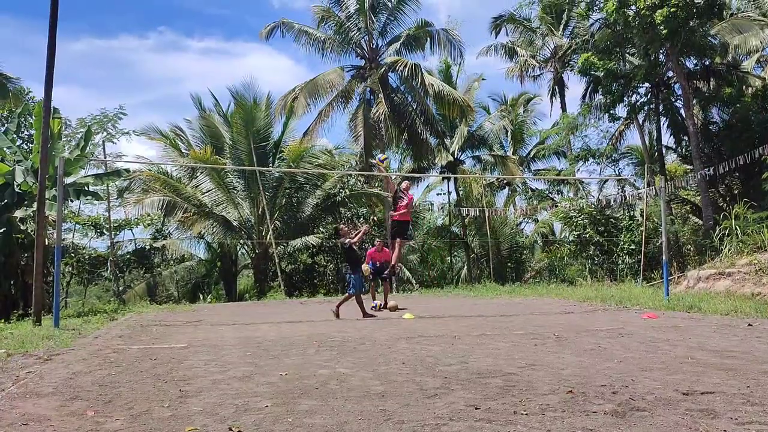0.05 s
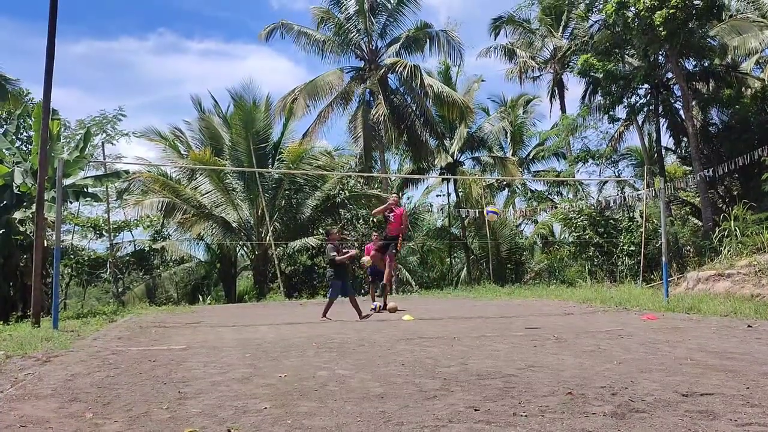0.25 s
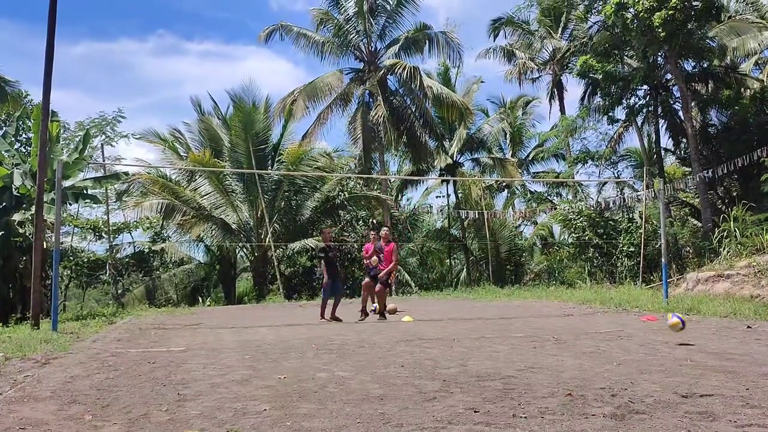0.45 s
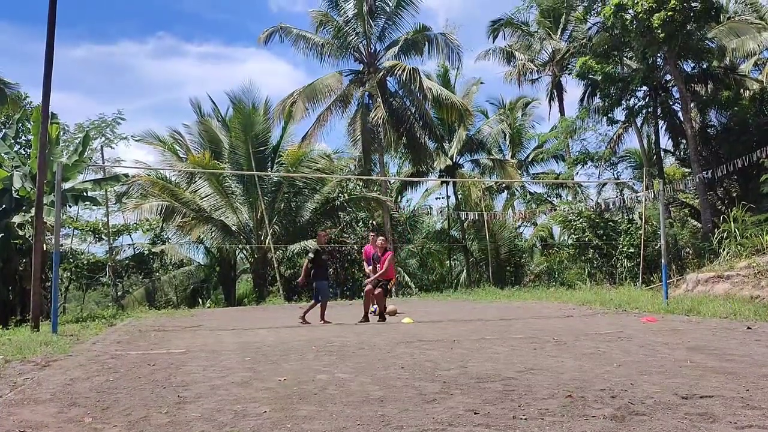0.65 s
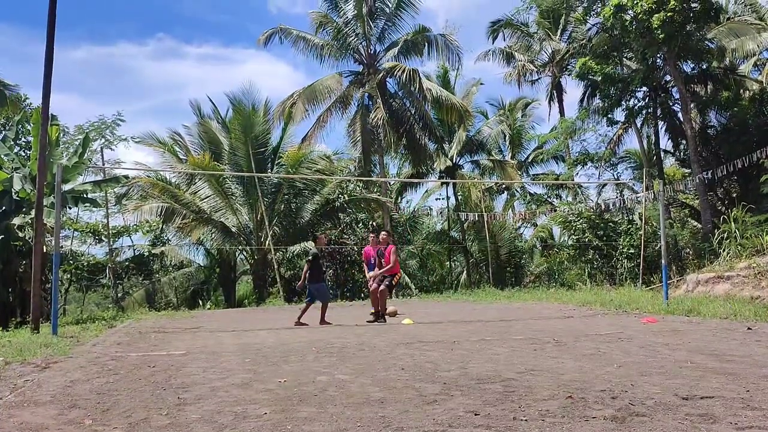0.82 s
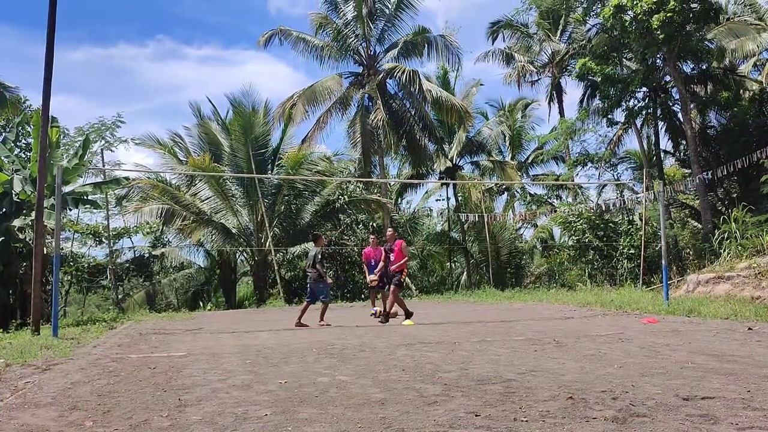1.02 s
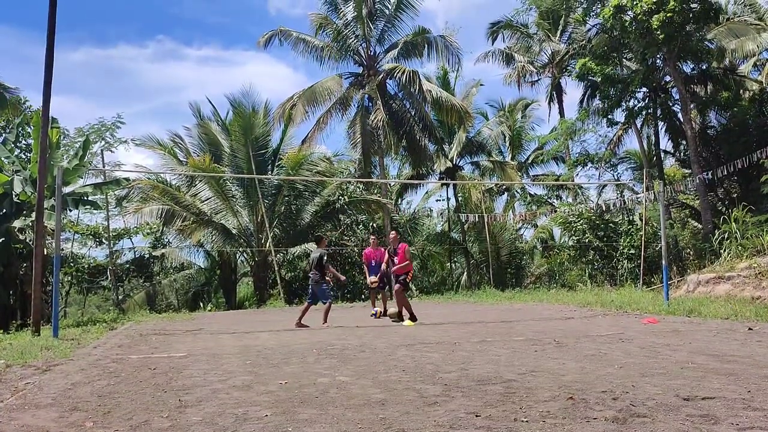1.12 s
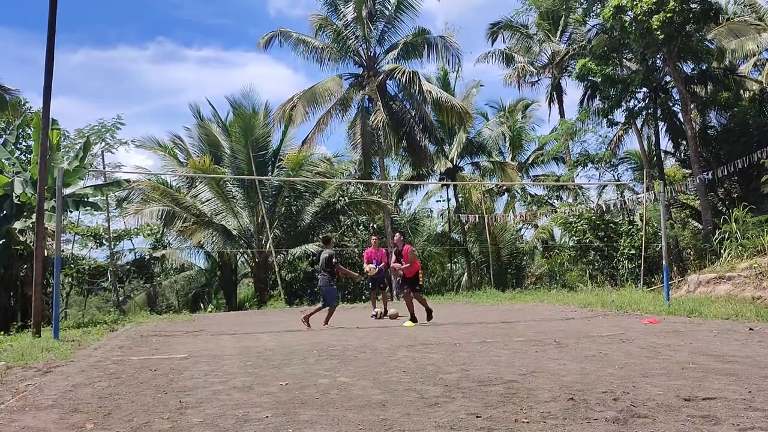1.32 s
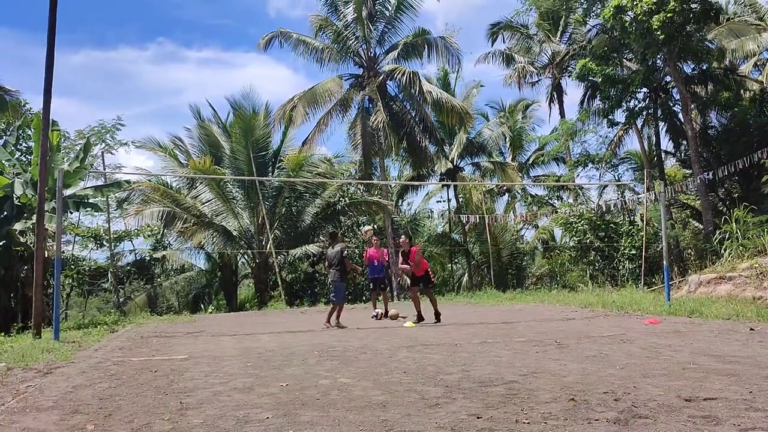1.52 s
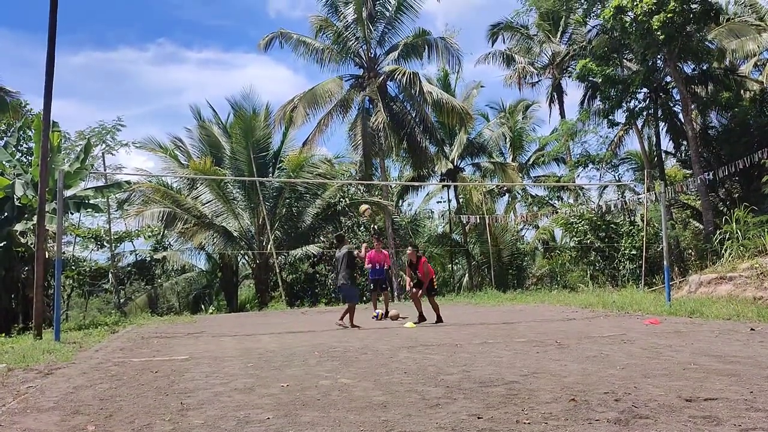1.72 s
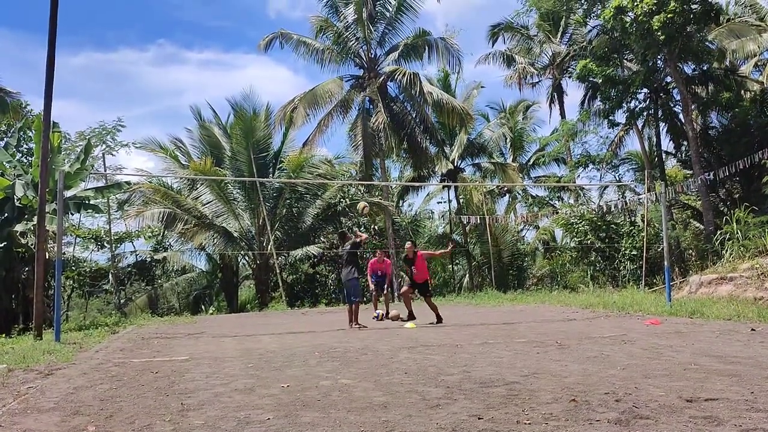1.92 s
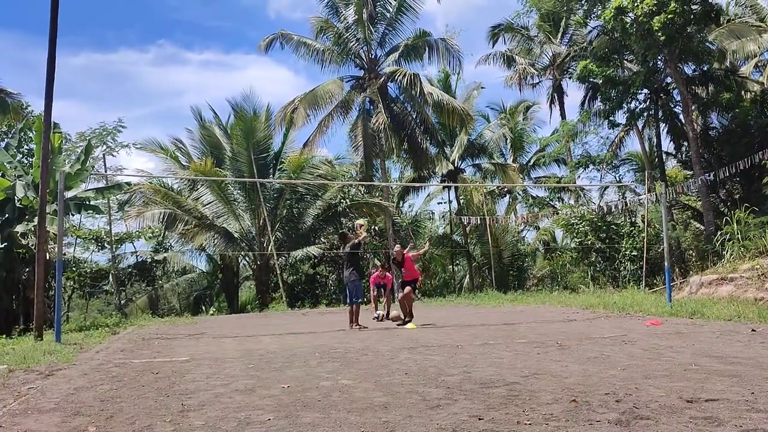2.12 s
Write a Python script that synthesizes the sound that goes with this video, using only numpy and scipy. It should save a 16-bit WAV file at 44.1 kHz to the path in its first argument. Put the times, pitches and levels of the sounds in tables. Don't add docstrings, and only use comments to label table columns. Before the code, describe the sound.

A volleyball is hit hard with a loud hollow smack, then bounces twice on dirt; faint cicadas, light breeze and scuffing feet continue, and a softer ball touch comes last, heard from a distance in stereo outdoors.

```python
import sys
import numpy as np
from scipy import signal
from scipy.fft import rfft, irfft
from scipy.io import wavfile

SR = 44100
rng = np.random.default_rng(int(sys.argv[2]) if len(sys.argv) > 2 else 0)


def natural_amplitude(level_db):
    exponent = np.asarray(level_db, float) / 20
    return 10 ** exponent


def materialize(psi):
    bounded = np.clip(np.atleast_2d(psi).T, -1, 1)
    quanta = np.round(bounded * 32767).astype(np.int16)
    wavfile.write(sys.argv[1], SR, quanta)


N = 94815


def rms_one(x):
    return x / np.sqrt(np.mean(x ** 2) + 1e-20)


def at_hz(points, hz):
    table = np.array(points)
    return np.interp(np.log(hz), np.log(table[:, 0]), table[:, 1])


def band(x, low_hz, high_hz):
    sos = signal.butter(2, [low_hz, min(high_hz, .45 * SR)], "band", fs=SR, output="sos")
    return signal.sosfilt(sos, x)


def drift(rate_hz):
    r = np.exp(-80 * np.pi * rate_hz / SR)
    white = rng.standard_normal(N // 40 + 2002)
    slow = signal.lfilter([1], [1, -2 * r, r * r], white)[2000:]
    return np.interp(np.arange(N) / 40, np.arange(len(slow)), rms_one(slow))


def hump(start_s, length_s):
    t = np.arange(N) / SR
    return np.sin(np.pi * np.clip((t - start_s) / length_s, 0, 1)) ** 2


# f/Hz, correlation
LIKENESS = [(60, 0.87), (180, 0.93), (540, 0.23), (1640, -0.37), (4930, 0.14), (14900, -0.53)]
EDGES_HZ = 25 * 2 ** np.arange(0, 9.3, .5)


def banded(spectrum, shape, patchy_db):
    out, power = 0, 0
    white = rng.standard_normal((2, 2, N))
    for k, (low, high) in enumerate(zip(EDGES_HZ, EDGES_HZ[1:])):
        mid, side = band(white[k % 2], low, high)
        hz = np.sqrt(low * high)
        level_db = at_hz(spectrum, hz)
        alike = np.clip(at_hz(LIKENESS, hz), -1, 1)
        power += natural_amplitude(level_db) ** 2 * (high - low) * 2 / SR
        stereo = np.sqrt(1 + alike) * mid + np.sqrt(1 - alike) * side * [[1], [-1]]
        out = out + natural_amplitude(level_db + patchy_db * drift(7)) * shape(hz) * stereo
    return out / np.sqrt(power)


# t/s, thump f/Hz, thump rise/s, left lag/s, contact/s
BLOWS = [
    (.1978, 150, .004, .0001, .0082),
    (.4431, 168, .0012, .0001, .0075),
    (.5920, 127, .0006, .0002, .009),
    (1.8461, 128, .001, .0006, .0103),
]
# thump level/dB, ring level/dB, slap level/dB, wash level/dB, ring tilt/(dB/octave)
VOICING = [(-11, -30.5, -12, -34, 2.5), (-23.5, -41, -22.5, -49, 3), (-15, -31, -19, -42, 0.5),
           (-21.5, -52.5, -44, -56, -10)]
# early echo loss/dB, ring on leaving/dB, slap f/Hz, ring length share, thump swings
AFTER = [(-2, -2, 3900, 1.0, 1.85), (-4, -3, 5200, .9, 1.75), (-2, -4, 2700, .9, 1.8),
         (-14, 6, 1800, .45, 1.5)]
# delay/s, level/dB
ECHOES = [(.0245, -15), (.031, -19), (.055, -24)]
# f/Hz, level/dB, t60/s
BALL = [(320, 20, 0.0059), (500.5, 0.3, 0.065), (704, 9, 0.012), (843, 5.5, 0.027), (1027, -8.5, 0.031),
        (1279, -5, 0.06), (1413, -2.5, 0.028), (1638, -13.5, 0.12), (2110, 0, 0.025), (2622, -0.5, 0.032),
        (3228, -8.5, 0.04), (3900, -16, 0.012), (4400, -21, 0.011), (5690, -25, 0.0076)]
THUMP_FADE, THUMP_HEAD_START = 2.0, .14
RING_RISE_S, LEAVE_TILT_DB = .0003, -1.5
SLAP_S, SLAP_SPREAD, SLAP_EDGE_DB = .003, 1.22, -9


def thump(t, hz, rise_s, swings):
    turn = np.clip(t * hz / swings, 0, 1)
    swing = np.sin(2 * np.pi * (hz * t + THUMP_HEAD_START))
    return swing * (1 - np.exp(-t / rise_s)) * np.cos(np.pi / 2 * turn ** THUMP_FADE)


def ball_ring(t, late_s, level_db, tilt_db, length_share):
    hz, mode_db, t60_s = np.array(BALL).T
    u = np.maximum(t - late_s, 0)
    chance_db = rng.normal(0, 1, len(hz))
    gains = natural_amplitude(level_db + mode_db + tilt_db * np.log2(hz / 1000) + chance_db)
    gains = gains * (-1) ** np.arange(len(hz))
    decays = natural_amplitude(-60 * u / length_share / t60_s[:, None])
    modes = np.sin(2 * np.pi * hz[:, None] * u) * decays
    return gains @ modes * (1 - np.exp(-u / RING_RISE_S))


def slap(t, hz):
    burst = rng.standard_normal(len(t)) * np.exp(-t / SLAP_S)
    body = band(burst, hz / SLAP_SPREAD, hz * SLAP_SPREAD)
    edge = band(burst * np.exp(-t / SLAP_S), hz, 2.25 * hz)
    return body + natural_amplitude(SLAP_EDGE_DB) * edge


def ball():
    out = np.zeros((2, N))
    t = np.arange(SR // 8) / SR
    for timing, voicing, after in zip(BLOWS, VOICING, AFTER):
        start_s, hz, rise_s, lag_s, contact_s = timing
        thump_db, ring_db, slap_db, _, tilt_db = voicing
        loss_db, leave_db, slap_hz, ring_share, swings = after
        blow = -natural_amplitude(thump_db) * thump(t, hz, rise_s, swings)
        blow -= ball_ring(t, 0, ring_db, tilt_db, ring_share)
        blow -= ball_ring(t, contact_s, ring_db + leave_db, tilt_db + LEAVE_TILT_DB, ring_share)
        blow += natural_amplitude(slap_db) * slap(t, slap_hz)
        for delay_s, db in [(0.0018, -loss_db)] + list(ECHOES):
            for side, arrival_s in enumerate((start_s + lag_s + delay_s, start_s + delay_s)):
                i = int(arrival_s * SR)
                out[side, i:i + len(t)] += natural_amplitude(db + loss_db) * blow
    return out


# f/Hz, level/(dB/Hz)
WASH = [(59, 1), (100, 11), (171, 4), (243, -13), (1080, -7), (1850, -14.5), (5410, -19), (10900, -34),
        (14000, -32)]
# f/Hz, t60/s
WASH_T60 = [(100, 0.12), (500, 0.46), (1500, 0.5), (5000, 0.64), (9000, 0.28), (14000, 0.75)]
WASH_TILT_DB = [0.77, 0.1, -3, -1]
WASH_RISE_S = 0.0013


def wash():
    t = np.arange(N) / SR

    def shape(hz):
        total = 0
        for (start_s, *_), (*_, db, _), tilt_db in zip(BLOWS, VOICING, WASH_TILT_DB):
            u = np.maximum(t - start_s, 0)
            level_db = db + tilt_db * np.log2(hz / 1000) - 60 * u / at_hz(WASH_T60, hz)
            total = total + natural_amplitude(level_db) * (1 - np.exp(-u / WASH_RISE_S))
        return total
    return banded(WASH, shape, patchy_db=1.5)


# t/s, level/dB
CICADA = [(0.0, -58), (0.22, -61.5), (0.4, -59.5), (0.58, -67), (0.6, -61), (1.65, -62), (1.68, -60),
          (1.71, -58.5), (1.89, -57), (1.92, -60), (1.96, -55.5), (2.15, -57)]
# t/s, rate f/Hz
CLICK_RATE = [(0, 180.2), (.5, 179.5), (.8, 179.), (1.1, 179.6), (1.45, 180.6), (1.75, 180.1),
              (1.95, 179.5), (2.15, 179.4)]
# f/Hz, half width/Hz, level/dB re near cicada
DRONES = [(3465, 45, -11), (6925, 50, -20), (3817, 25, -19)]
TYMBAL_HZ, TYMBAL_WIDTH_HZ = 13900, 200
CHORUS_DB, CHORUS_LOW_HZ, CHORUS_HIGH_HZ = -4, 13700, 14280


def cicadas():
    t = np.arange(N) / SR
    rate_hz = np.interp(t, *np.transpose(CLICK_RATE))
    phase = 2 * np.pi * np.cumsum(rate_hz) / SR
    near = 0
    for k in range(69, 81):
        tone = np.sin(k * phase + drift(20) * .5 + np.array([[0], [1.7]]))
        resonance = 1 / (1 + ((k * rate_hz - TYMBAL_HZ) / TYMBAL_WIDTH_HZ) ** 2)
        near = near + tone * natural_amplitude(2 * drift(10)) * resonance
    chorus = band(rng.standard_normal((2, N)), CHORUS_LOW_HZ, CHORUS_HIGH_HZ)
    chorus = band(chorus, CHORUS_LOW_HZ - 300, CHORUS_HIGH_HZ)
    out = rms_one(near) * natural_amplitude([[-1.5], [1.5]]) + natural_amplitude(CHORUS_DB) * rms_one(chorus)
    for hz, width_hz, db in DRONES:
        drone = band(rng.standard_normal((2, N)), hz - width_hz, hz + width_hz)
        out += natural_amplitude(db + drift(15)) * rms_one(drone)
    return natural_amplitude(np.interp(t, *np.transpose(CICADA))) * out


# t/s, length/s, level/dB, f/Hz
SCUFFS = [(.17, 0.009, -58, 1260), (0.414, 0.098, -52.5, 2800), (0.456, 0.13, -62, 5040),
          (0.465, 0.068, -52.5, 524), (0.578, 0.028, -38.5, 560), (0.693, 0.093, -63, 1360),
          (1.109, 0.037, -65, 670), (1.312, 0.047, -68, 5200), (1.331, 0.079, -65.5, 790),
          (1.532, 0.22, -60, 960), (1.596, 0.17, -62.5, 1820), (1.645, .11, -62, 3320),
          (1.88, .14, -70, 900), (1.87, 0.16, -66, 3020), (1.875, 0.12, -68, 5650)]


def feet():
    grit = rng.standard_normal(N) * natural_amplitude(2 * rng.exponential(1, N))
    out = 0
    for start_s, length_s, db, hz in SCUFFS:
        scrape = rms_one(band(grit, hz / 1.76, hz * 1.365))
        out = out + natural_amplitude(db) * hump(start_s, length_s) * scrape
    return out


PIP_S, PIP_LENGTH_S, PIP_HZ, PIP_ARCH_HZ, PIP_DB = .925, .065, 3800, 430, -68


def bird():
    arch = hump(PIP_S, PIP_LENGTH_S)
    pitch_hz = PIP_HZ + PIP_ARCH_HZ * np.sqrt(arch)
    return natural_amplitude(PIP_DB) * arch * np.sin(2 * np.pi * np.cumsum(pitch_hz) / SR)


MOTOR_S, MOTOR_LENGTH_S, MOTOR_HZ, MOTOR_DB, MOTOR_OCTAVE_DB = .92, .45, 200, -54, -13


def motor():
    phase = 2 * np.pi * np.cumsum(MOTOR_HZ + 2.38 * drift(5.6)) / SR
    hum = np.sin(phase) + natural_amplitude(MOTOR_OCTAVE_DB) * np.sin(2 * phase)
    return natural_amplitude(MOTOR_DB) * hump(MOTOR_S, MOTOR_LENGTH_S) * hum


# f/Hz, level/(dB/Hz)
AIR = [(15, -33), (25, 2), (120, 1.5), (411, -18.5), (658, -20), (855, -25.5), (1300, -24.5), (3510, -29),
       (13000, -46)]
# t/s, level/dB
BREEZE = [(0, -1.5), (.5, 3), (1., -.5), (1.5, 1.34), (1.9, 2.5), (2.15, 1.3)]
AIR_DB = -52.5


def air():
    breeze = natural_amplitude(AIR_DB + np.interp(np.arange(N) / SR, *np.transpose(BREEZE)))
    return banded(AIR, lambda hz: breeze, patchy_db=0.5)


def scene():
    return ball() + wash() + cicadas() + feet() + bird() + motor() + air()


def band_limit(x):
    return signal.sosfilt(signal.butter(12, 15460, fs=SR, output="sos"), x)


# f/Hz, left minus right level/dB
PORTS = [(60, 1.5), (130, -1.0), (290, 0.5), (640, 1.0), (1400, -1.5), (3080, -8.5), (6760, -10),
         (14900, -3.5)]
LOW_CUT_HZ, TOP_HZ = 40, 14700


def record(dry):
    hz = np.maximum(np.fft.rfftfreq(2 * N, 1 / SR), 1)
    half_db = at_hz(PORTS, hz) / 2
    heard = irfft(rfft(dry, 2 * N) * natural_amplitude([half_db, -half_db]))[:, :N]
    heard = signal.sosfilt(signal.butter(2, LOW_CUT_HZ, "high", fs=SR, output="sos"), heard)
    heard = signal.sosfilt(signal.cheby2(12, 50, TOP_HZ, fs=SR, output="sos"), heard)
    return band_limit(heard)


dry = scene()
out = record(dry)
materialize(out)
```